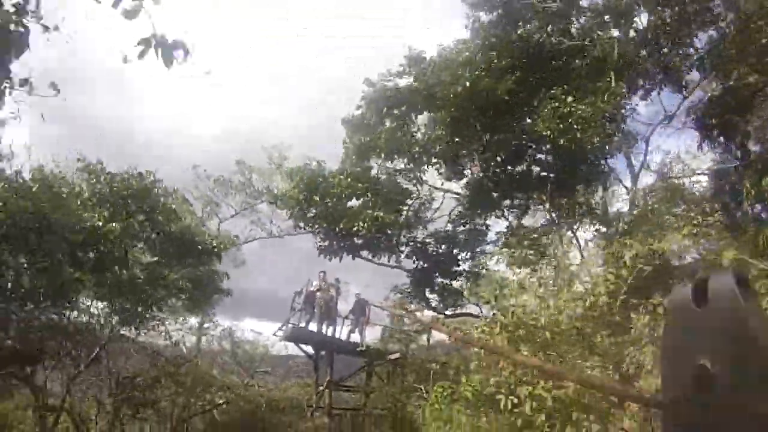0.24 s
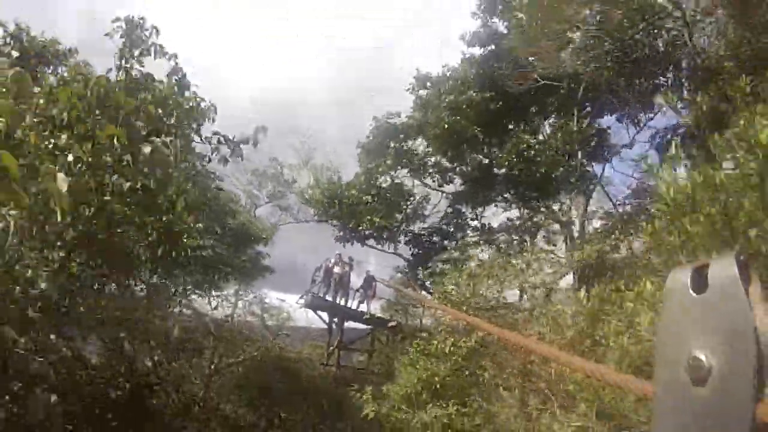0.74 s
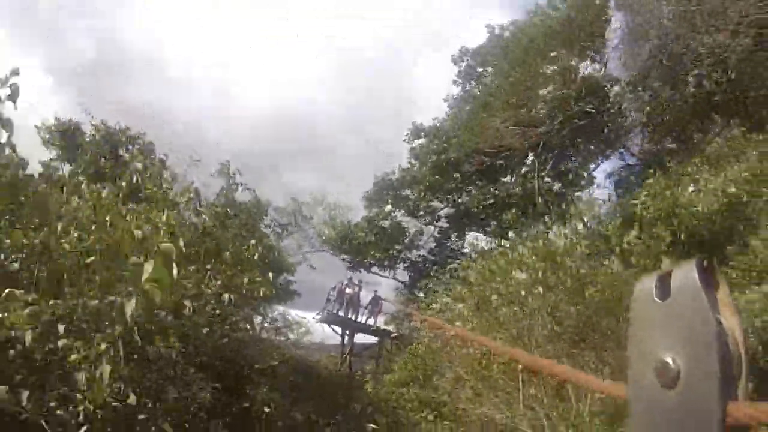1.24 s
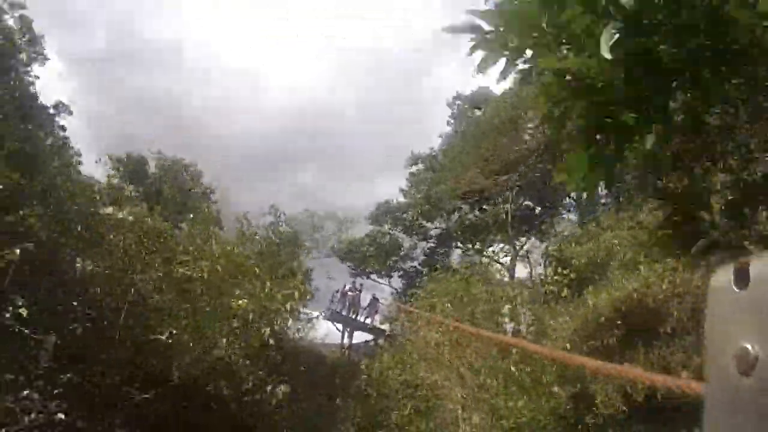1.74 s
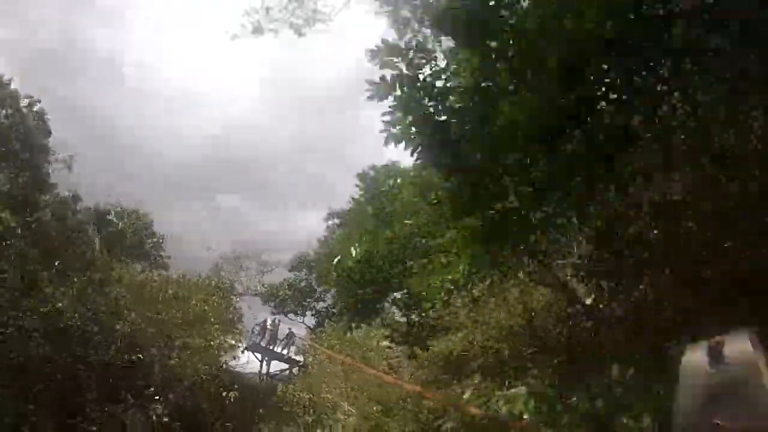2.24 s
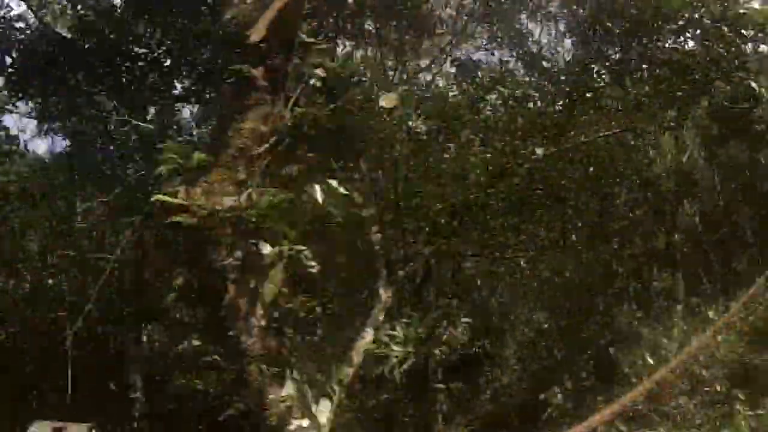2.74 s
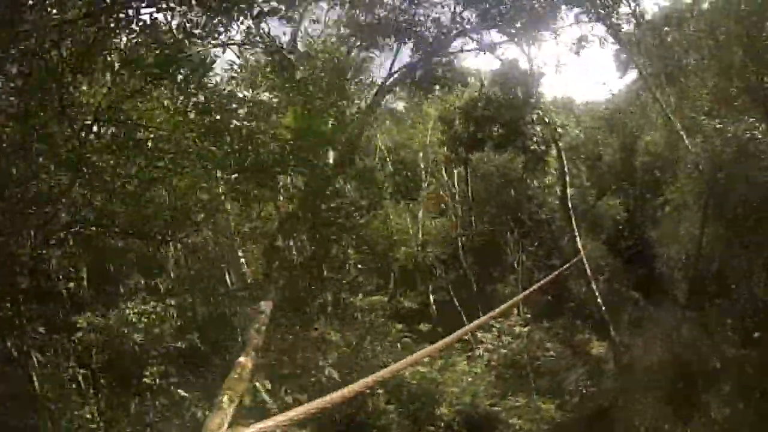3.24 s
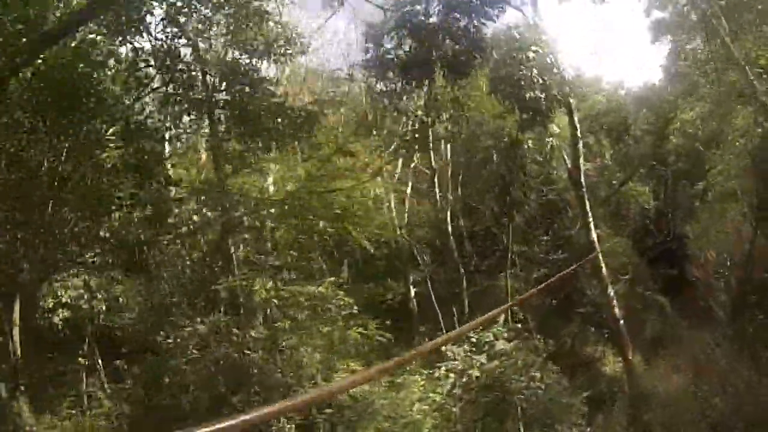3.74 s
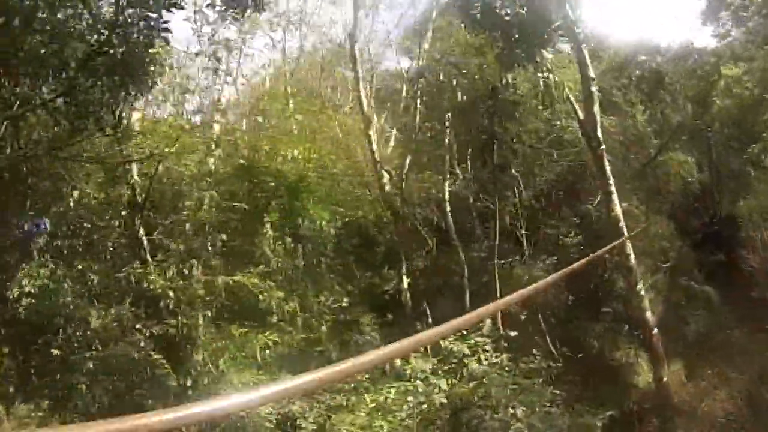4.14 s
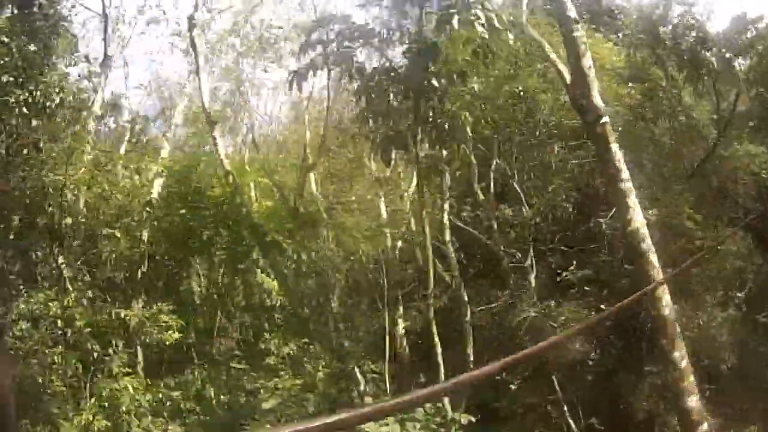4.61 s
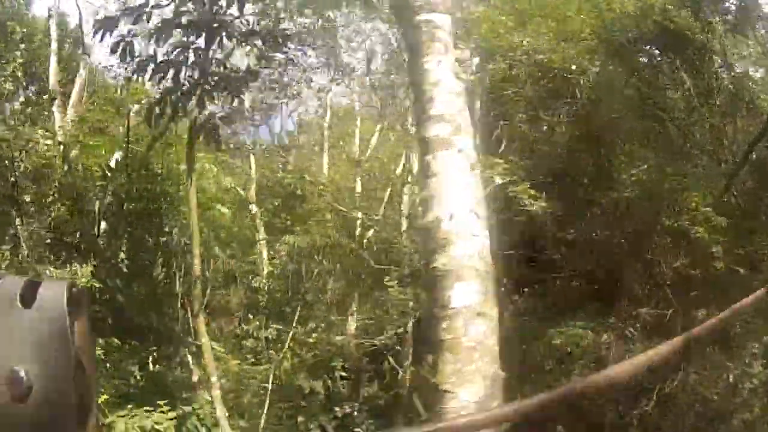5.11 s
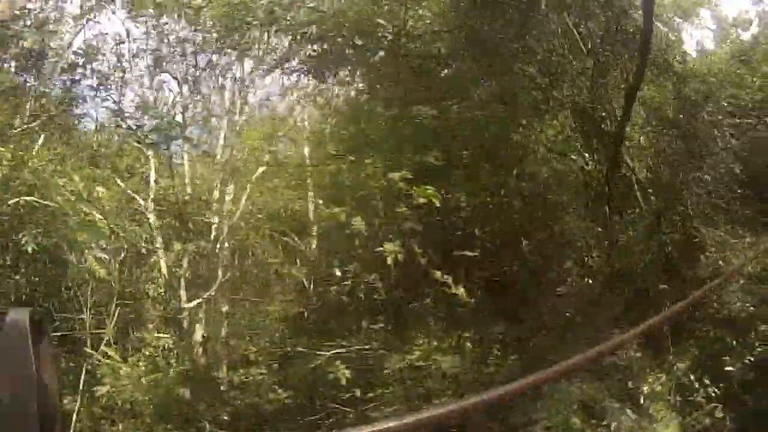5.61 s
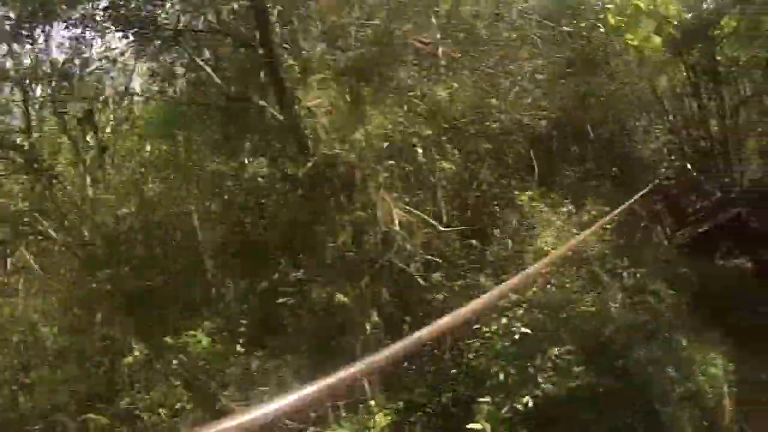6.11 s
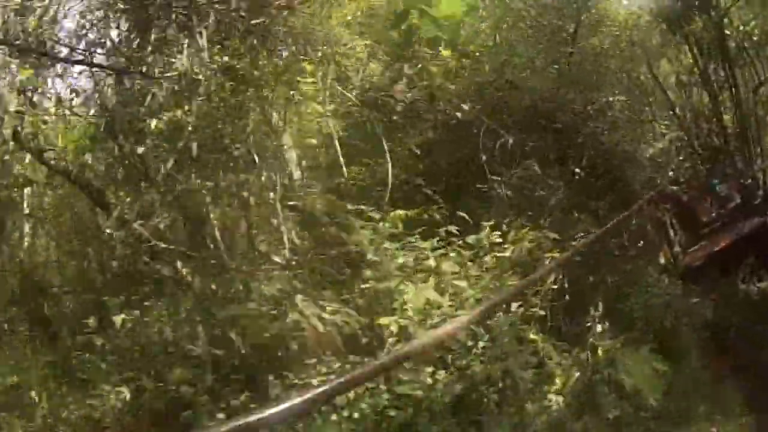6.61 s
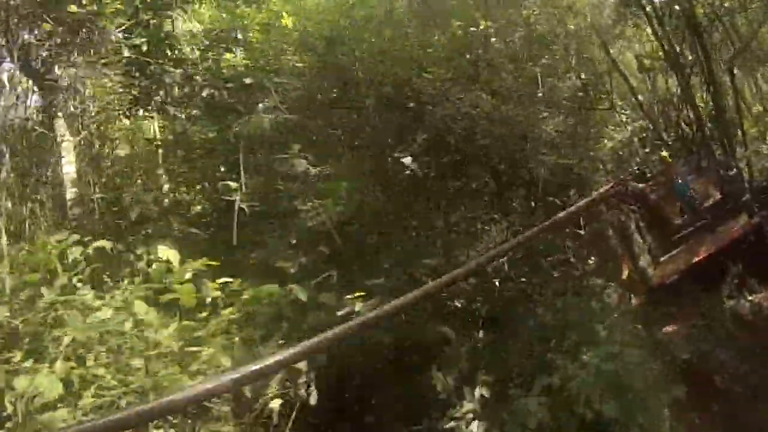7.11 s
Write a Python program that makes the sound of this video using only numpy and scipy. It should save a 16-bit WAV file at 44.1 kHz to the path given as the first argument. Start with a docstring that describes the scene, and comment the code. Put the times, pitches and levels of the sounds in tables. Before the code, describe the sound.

Wind rumbles on the microphone while a zip line pulley runs down its cable, making a steady metallic rasp and a slowly shifting whine.

```python
"""A gritty, ringing rush and a whine over buffeting wind: a zip line ride, heard from the rider's camera.
The trolley's sheaves roll over the twisted strands of a steel cable. The whine follows the speed;
the contact noise rings trolley and cable. The rider looks back, swings round, then faces the landing
platform, and each pose colours the sound. Air buffets the microphone throughout."""
import sys
import numpy as np
from scipy import signal
from scipy.fft import rfft, irfft
from scipy.io import wavfile
from scipy.ndimage import uniform_filter1d

SR = 44100
rng = np.random.default_rng(int(sys.argv[2]) if len(sys.argv) > 2 else 0)


def log_audio(samples):
    """Write samples as a 16-bit WAV file to the path given in sys.argv[1]."""
    # one column per channel
    frames = np.atleast_2d(samples).T
    # limit to full scale, then quantise
    limited = np.clip(frames, -1, 1)
    pcm = np.round(limited * 32767).astype(np.int16)
    wavfile.write(sys.argv[1], SR, pcm)


N = 324576
TIME = np.arange(N) / SR
HZ = np.fft.rfftfreq(N, 1 / SR)

# strands passing under the sheaves: t/s, rate/Hz
STRAND_RATE = [(0, 271), (1, 297), (1.5, 306), (2.5, 321), (3.2, 327), (4.2, 324), (5, 315), (5.5, 308),
               (6.3, 285), (7.36, 249)]
# rider's turn: t/s, pose (0 looking back, 1 swung round, 2 facing the landing)
POSE = [(0, 0), (1.6, .03), (2.35, .08), (2.55, .45), (2.72, 1), (5.65, 1.03), (6.1, 2)]


def amp(db):
    """Decibels to gain."""
    return 10 ** (np.asarray(db) / 20)


def unit(x):
    """Scale to rms 1."""
    return x / np.sqrt(np.mean(x ** 2) + 1e-20)


def curve(rows):
    """Time table to one value per sample."""
    return np.interp(TIME, *np.transpose(rows))


def swells(rows):
    """Sum of Gaussian swells in dB; length is the width at half height."""
    return sum(db * 2 ** -(2 * (TIME - peak_s) / length_s) ** 2 for peak_s, length_s, db in rows)


def colour(points, hz):
    """Gain of a spectrum table at hz."""
    points_hz, db = np.transpose(points)
    return amp(np.interp(np.log(hz + 1), np.log(points_hz), db))


def bell(hz, centre_hz, width_hz):
    """Power of a steep-sided resonance, 1 at its centre."""
    return 1 / (1 + (np.sqrt(2) - 1) * (2 * (hz - centre_hz) / width_hz) ** 2) ** 2


def split(x, edge_hz):
    """Parts of x below and above edge_hz."""
    low_share = 1 / (1 + (HZ / edge_hz) ** 8)
    return irfft(rfft(x) * low_share, N), irfft(rfft(x) * (1 - low_share), N)


def noise(gain):
    """Noise of rms 1 with the given spectrum."""
    return unit(irfft(rfft(rng.standard_normal(N)) * gain, N))


def wander(rate_hz):
    """Random motion up to about rate_hz."""
    return noise(1 / (1 + (HZ / rate_hz) ** 4))


def facing_landing():
    """0 to 1 as the rider turns to the platform."""
    return np.clip(curve(POSE) - 1, 0, 1)


def buffeting(lee_db=-39, open_db=-35, turbulence_db=1.03, steadiness=0.29):
    """Eddies shed by the camera hit the microphone, harder once it swings into the airflow."""
    # eddy spectrum: f/Hz, level/dB
    spectrum = [(10, -16), (22, 0.5), (35, -2.5), (50, -2.5), (58, -5.5), (66, -18), (85, -26), (120, -38),
                (200, -43.5), (450, -57), (2000, -100)]
    # gusts and lulls: peak t/s, length/s, gain/dB
    gusts = [(.64, 0.047, 7), (1.15, 0.11, -7.5), (1.93, 0.05, -8), (2.62, 0.086, 10.5), (2.73, 0.053, -8),
             (2.97, 0.26, 3.5), (3.28, 0.12, 3), (3.95, 0.065, -10), (4.22, 0.15, -4.5), (4.58, 0.047, 4),
             (5.59, 0.094, -12), (7.0, 0.08, 0)]
    eddies = noise(colour(spectrum, HZ))
    envelope = np.sqrt(uniform_filter1d(eddies ** 2, size=5000) + 1e-9)
    exposure = np.minimum(curve(POSE), 1)
    level_db = lee_db + (open_db - lee_db) * exposure + swells(gusts) + turbulence_db * wander(5.5)
    return unit(eddies / envelope ** steadiness) * amp(level_db)


def air_rush():
    """Air flows softly round the camera."""
    # rush: t/s, level/dB
    level = [(0, -59.5), (1.1, -56.5), (1.95, -52.8), (3.2, -57), (4.65, -61), (5.3, -56.5), (6.3, -59.5),
             (7.36, -59.5)]
    # rush spectrum: f/Hz, level/dB
    spectrum = [(40, -25), (80, 6), (120, 1), (200, -2), (300, -3.5), (450, -16), (800, -27), (2000, -64)]
    return noise(colour(spectrum, HZ)) * amp(curve(level))


def rough_spots(fade_s=0.0045, small_per_s=8, small_db=3):
    """Envelope of the sheaves' clicks over rough spots: a few big, many small at random."""
    # worst spots: t/s, level/dB re rolling force
    big_spots = [(0.342, 11), (.589, 10.5), (2.072, 9), (2.134, 8), (2.428, 11), (3.133, 12), (3.707, 11),
                 (4.16, 9), (4.5, 13.5), (4.755, 12), (4.929, 14.5), (5.047, 11.5), (5.561, 13.5),
                 (6.246, 8), (6.429, 10), (6.461, 13.5), (6.494, 12.5), (6.528, 6)]
    power = (rng.random(N) < small_per_s / SR) * amp(small_db) ** 2
    for at_s, db in big_spots:
        power[round(at_s * SR) - SR // 1000] += amp(db) ** 2
    return np.sqrt(signal.lfilter([1], [1, -np.exp(-2 / (fade_s * SR))], power + 1e-18))


def wire_slips(per_s=700, fade_s=0.0018):
    """Tiny slips of the wires start at once and die away; mean 0, rms 1."""
    onsets = rng.exponential(1, N) * (rng.random(N) < per_s / SR)
    strength = np.sqrt(signal.lfilter([1], [1, -np.exp(-1 / (fade_s * SR))], onsets))
    return unit(strength - strength.mean())


def rolling_force(strands, click_envelope, strands_per_turn=9, smooth_hz=2100, sizzle_hz=8500):
    """Contact noise: smooth lows, sizzling top, gritty mids that swell twice a turn and at each strand."""
    # the swaying rider makes the sheaves scrub sideways: peak t/s, length/s, grind/dB, sizzle/dB
    scrubs = [(2.033, 0.6, 2.5, 0.5), (2.65, 0.53, 5, 3.5), (4.95, .6, 1.5, 2), (5.663, 0.55, 3.5, 4.3),
              (7.15, 0.61, 1.5, 2)]
    # click spectrum: f/Hz, level/dB
    click_spectrum = [(1500, -12), (3000, -3), (4100, 3), (5500, -1), (8000, -2), (13000, -6)]
    smooth_db = -2.5 + swells((peak_s, length_s, db) for peak_s, length_s, db, _ in scrubs)
    sizzle_db = -2.5 + swells((peak_s, length_s, db) for peak_s, length_s, _, db in scrubs)
    sizzle_db += 0.5 * facing_landing()
    wobble = np.cos(2 * np.pi * (2 * strands / strands_per_turn + 0.023 * wander(5.2)))
    slips = wire_slips()
    contact = rng.standard_normal(N)
    clicks = irfft(rfft(click_envelope * rng.standard_normal(N)) * colour(click_spectrum, HZ), N)
    pressure_db = 2.24 * slips + 1.7 * wobble + 0.5 * np.cos(2 * np.pi * strands)
    smooth, _ = split(unit(contact * amp(0.9 * slips)), smooth_hz)
    _, rough = split(unit(contact * amp(pressure_db) + clicks), smooth_hz)
    grit, _ = split(rough, sizzle_hz)
    _, sizzle = split(unit(contact * amp(3.0 * slips) + clicks), sizzle_hz)
    return smooth * amp(smooth_db) + grit + sizzle * amp(sizzle_db)


def ring(force, modes, pose):
    """Force through the resonances and notches of one pose."""
    # bands cancelled by reflections near the camera: f/Hz, width/Hz, gain/dB in poses 0, 1, 2
    notches = [(1762.0, 174.0, -10.0, -6.5, 0.0), (2053.0, 257.0, 0.0, -5.3, -6.1),
               (2888.0, 143.0, -9.1, 0.0, -3.0), (3360.0, 116.0, -2.0, -4.2, -9.1),
               (4624.0, 104.0, -2.1, -0.8, -8.7), (7228.0, 360.0, -6.7, -5.1, -9.4),
               (9208.0, 236.0, -10.1, 0.0, -7.8)]
    hz = np.fft.rfftfreq(8192, 1 / SR)[:, None]
    mode_hz, width_hz, *mode_db = np.transpose(modes)
    power = (amp(mode_db[pose]) ** 2 * bell(hz, mode_hz, width_hz)).sum(1)
    notch_hz, width_hz, *notch_db = np.transpose(notches)
    power *= amp((notch_db[pose] * bell(hz, notch_hz, width_hz)).sum(1)) ** 2
    # minimum phase: each resonance rings after the push
    log_gain = np.log(np.r_[power, power[-2:0:-1]] + 1e-12) / 2
    response = np.fft.ifft(np.exp(np.conj(signal.hilbert(log_gain)))).real
    return signal.oaconvolve(force, response[:len(hz)])[:N]


def radiate(force, modes):
    """The balance of resonances crossfades from pose to pose as the rider turns."""
    turn = np.clip(curve(POSE), 0, 2)
    return sum(np.maximum(1 - abs(turn - pose), 0) * ring(force, modes, pose) for pose in range(3))


def whine(strands, base_db=-49.5, landing_db=-3, jitter_hz=21, flutter_db=1.5):
    """Strands drum on the sheaves; their uneven lay blurs each partial."""
    # partials: multiple of the strand rate, level/dB
    partials = [(2, -5), (3, -2), (4, -6), (4.62, 2)]
    # how well the cable sounds the whine: f/Hz, gain/dB
    response = [(500, -9), (600, -12.5), (650, -17), (760, -19), (830, -7), (1000, 0.5), (1200, -5.5),
                (1290, -9.5), (1400, -14), (1500, -11)]
    # surge at top speed: peak t/s, length/s, gain/dB
    surges = [(3.17, 0.19, 4.5)]
    rate_hz, tones = curve(STRAND_RATE), np.zeros(N)
    for multiple, db in partials:
        hz = multiple * rate_hz
        tone = np.sin(2 * np.pi * (multiple * strands + 0.12 * wander(jitter_hz)))
        tone = unit(tone * amp(flutter_db * wander(8.2)))
        sheave_resonance_db = 9 * bell(hz, centre_hz=977, width_hz=40)
        tones += amp(db + sheave_resonance_db) * colour(response, hz) * tone
    return tones * amp(base_db + swells(surges) + landing_db * facing_landing())


def cable(strands, click_envelope):
    """The rolling force drives the cable's broad resonances."""
    # cable modes: f/Hz, width/Hz, gain/dB in poses 0, 1, 2
    modes = [(621.0, 610.0, -43.2, -51.8, -44.2), (877.0, 227.0, -30.8, -33.0, -36.6),
             (1116.0, 121.0, -24.2, -28.2, -42.7), (1339.0, 199.0, -39.0, -32.1, -29.2),
             (1740.0, 288.0, -37.7, -20.4, -29.9), (2052.0, 224.0, -23.5, -37.8, -30.2),
             (2688.0, 215.0, -28.8, -46.5, -38.3), (2966.0, 195.0, -36.6, -28.2, -29.6),
             (3248.0, 283.0, -43.0, -27.8, -34.2), (3738.0, 373.0, -42.7, -37.5, -40.7),
             (5234.0, 287.0, -36.5, -33.6, -39.6), (6668.0, 305.0, -35.7, -48.0, -55.1),
             (9392.0, 923.0, -52.0, -49.4, -60.0), (10365.0, 768.0, -67.6, -53.2, -55.1)]
    # force in the cable: t/s, gain/dB
    drive = [(0, -3), (2.8, -1), (4.5, 2.8), (5.6, -0.3), (6.1, 1.2), (6.45, -1), (7, -0.6), (7.36, -4)]
    return radiate(rolling_force(strands, click_envelope) * amp(curve(drive)), modes)


def trolley(strands, click_envelope):
    """The rolling force rings sheaves and side plates."""
    # trolley modes: f/Hz, width/Hz, gain/dB in poses 0, 1, 2
    modes = [(362.0, 65.0, -38.7, -34.8, -37.3), (976.0, 80.0, -44.6, -24.5, -26.4),
             (1182.0, 69.0, -36.9, -24.7, -28.4), (1429.0, 166.0, -25.2, -24.4, -30.5),
             (2328.0, 54.0, -15.7, -15.9, -21.4), (2458.0, 210.0, -25.8, -24.7, -32.8),
             (3006.0, 50.0, -16.8, -16.9, -30.6), (3549.0, 193.0, -30.2, -44.7, -48.2),
             (4054.0, 196.0, -34.2, -30.6, -32.5), (4282.0, 522.0, -33.6, -37.3, -40.5),
             (4738.0, 55.0, -28.6, -29.8, -29.7), (4975.0, 95.0, -34.1, -31.0, -38.0),
             (6159.0, 479.0, -42.9, -45.9, -45.8), (6472.0, 62.0, -36.8, -31.9, -39.3),
             (7489.0, 180.0, -48.4, -36.7, -41.0), (7582.0, 611.0, -41.5, -40.5, -42.7),
             (8623.0, 401.0, -50.8, -49.3, -53.6), (9335.0, 160.0, -50.5, -40.3, -54.8),
             (11286.0, 630.0, -60.4, -56.1, -64.4), (12305.0, 100.0, -59.4, -49.5, -61.1),
             (12902.0, 4203.0, -66.0, -64.3, -68.7)]
    # force in the trolley: t/s, gain/dB
    drive = [(0, -2.1), (.6, 2.1), (1.4, 1), (2.9, 0.07), (4.6, 0.6), (5.75, -2.5), (6.2, 1.6),
             (6.45, -0.6), (7.36, -2)]
    return radiate(rolling_force(strands, click_envelope) * amp(curve(drive)), modes)


def scene():
    """Trolley, cable and whine share one rolling motion; wind lies beneath."""
    strands = np.cumsum(curve(STRAND_RATE)) / SR  # count passed so far
    click_envelope = rough_spots()
    rolling = trolley(strands, click_envelope) + cable(strands, click_envelope) + whine(strands)
    return (rolling + buffeting() + air_rush())[None]


def record(dry, edge_hz=15250):
    """The camera's band limit."""
    lowpass = signal.firwin(511, edge_hz, window=("kaiser", 9), fs=SR)
    return signal.oaconvolve(dry, lowpass[None], "same")


dry = scene()
out = record(dry)
log_audio(out)
```